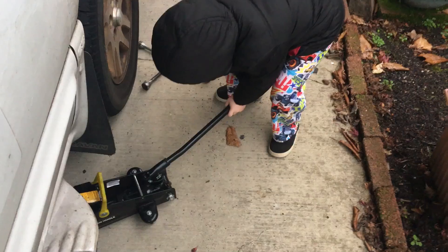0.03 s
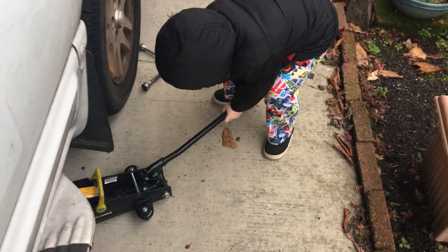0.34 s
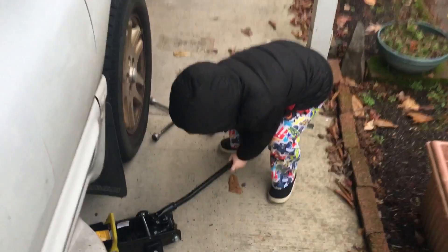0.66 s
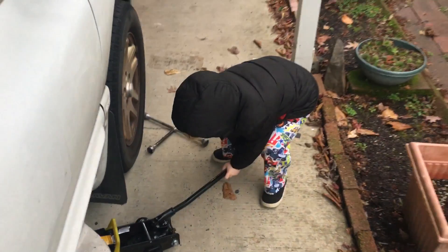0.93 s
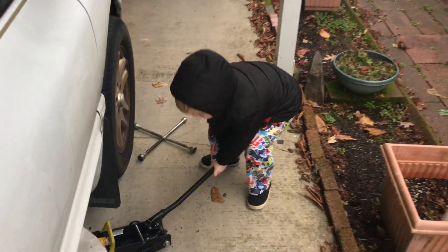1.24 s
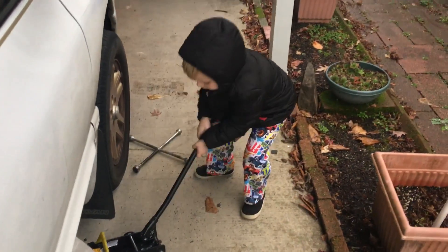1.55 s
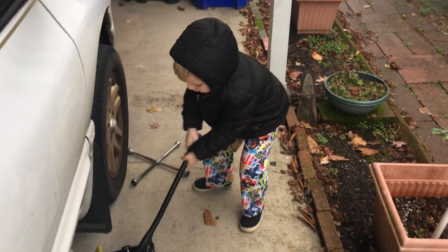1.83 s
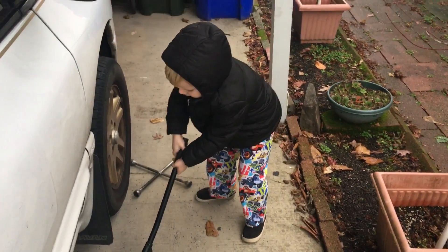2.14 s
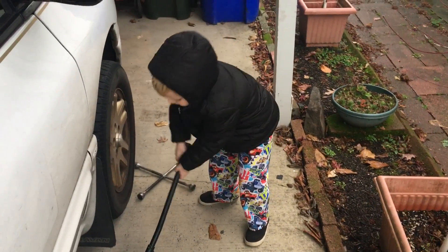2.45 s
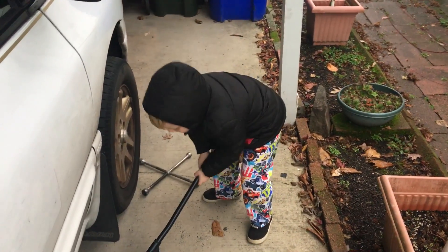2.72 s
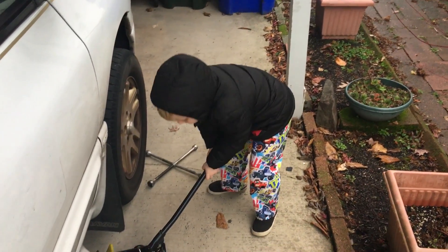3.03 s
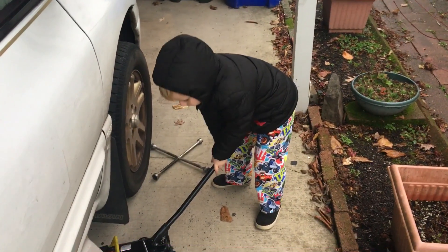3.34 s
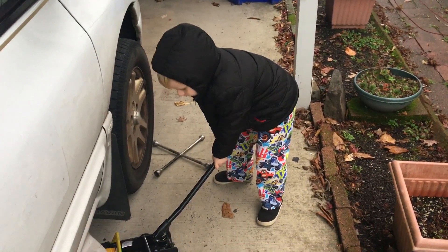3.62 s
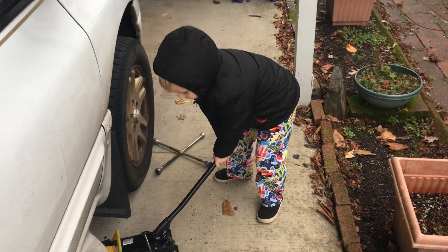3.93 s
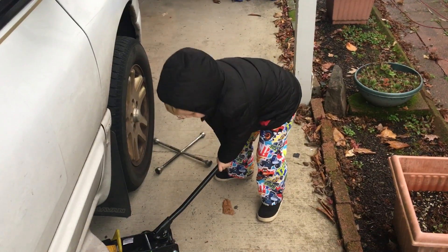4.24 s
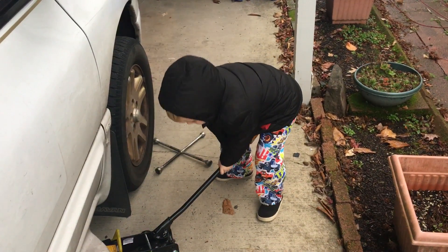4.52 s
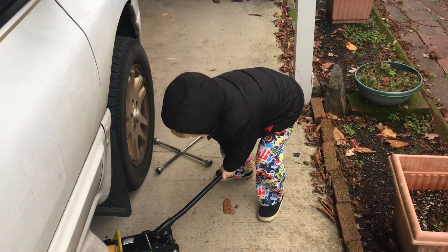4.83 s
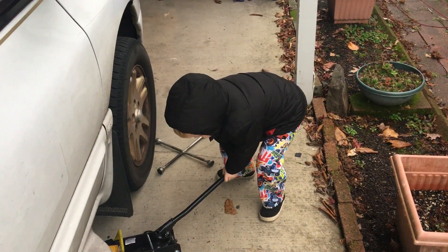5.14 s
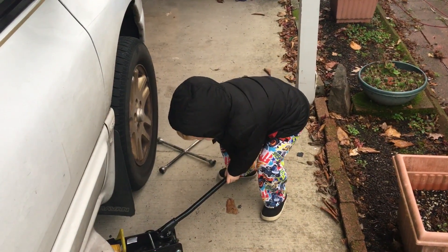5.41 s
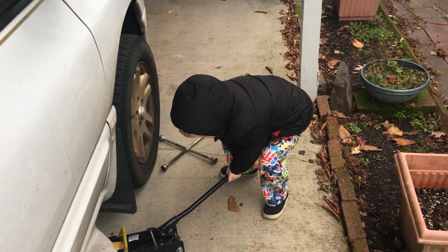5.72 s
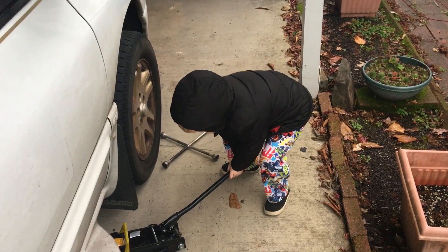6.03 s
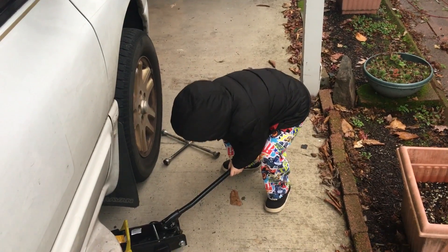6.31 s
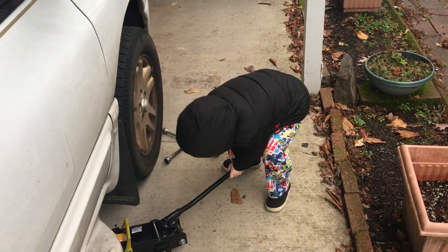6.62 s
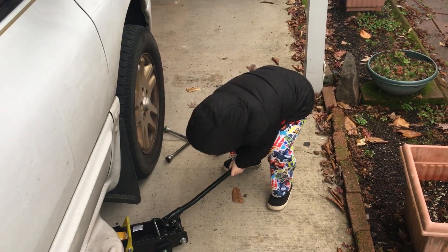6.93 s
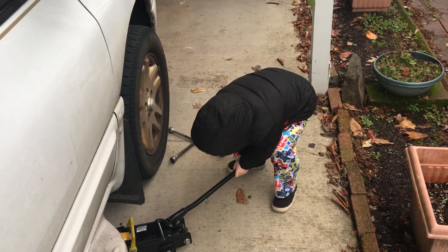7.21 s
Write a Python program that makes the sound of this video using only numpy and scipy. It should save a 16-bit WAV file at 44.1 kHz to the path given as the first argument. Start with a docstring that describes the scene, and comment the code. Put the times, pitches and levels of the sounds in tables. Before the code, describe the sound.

A floor jack handle is worked close to the microphone outdoors, clinking and clunking in two brief rattling bursts early on and once more, damped, near the end. Small taps and pings fall in between, while a nylon jacket rustles softly and shoes scuff faintly on gritty concrete. Behind it all are a steady hiss, far traffic rumble and a low engine drone that swells briefly at the start and for longer in the second half.

```python
"""Light taps and a rustle over a distant engine, then bright steel knocks: a floor jack's handle at work.
The long handle rattles in its loose socket and rings the jack's frame; a parked car and the house throw
the sound back across the concrete driveway. Shoes scuff grit and a jacket swishes, while the engine
drones and slowly gains speed in two gears under outdoor hiss and rumble."""
import sys
import numpy as np
from scipy import signal
from scipy.fft import rfft, irfft
from scipy.io import wavfile
from scipy.ndimage import uniform_filter1d

SR = 44100
rng = np.random.default_rng(int(sys.argv[2]) if len(sys.argv) > 2 else 0)


def store_wav(level_fs):
    """Save 16-bit WAV to argv[1]."""
    pcm = np.round(np.clip(np.atleast_2d(level_fs), -1, 1) * 32767)
    wavfile.write(sys.argv[1], SR, pcm.T.astype(np.int16))


N = 325017
T = np.arange(N) / SR


def jack(gain_db=-1, bounce_s=.027, bounce_shrink=.6, frame_hz=327):
    """The handle knocks in its socket; each rebound comes sooner and weaker and rocks the frame."""
    # handle knocks: start_s, thud_db, ring_db, tick_db, contact_hz (pitch the contact favours), rebounds
    knocks = [(1.454, -51, -43, -58, 2400, 0), (1.483, -46, -40.5, -51, 2340, 0),
              (1.489, -42.5, -44, -49.5, 1440, 0), (1.498, -43.5, -41, -52, 2070, 0),
              (1.569, -45, -39.5, -49, 2120, 0), (1.586, -36.5, -41.5, -46, 715, 2),
              (1.801, -48, -41.5, -48, 3070, 0), (1.845, -51, -47, -46, 7000, 1),
              (1.893, -41.5, -41.5, -71, 1020, 1), (2.576, -54, -43.5, -44.5, 10500, 0),
              (2.588, -47, -44, -44.5, 6660, 0), (2.608, -48, -35.5, -44, 2080, 0),
              (2.633, -45.5, -33.5, -49, 2110, 3), (2.716, -43, -47.5, -59, 730, 0),
              (2.740, -44, -50, -55, 320, 0), (6.7707, -51, -37.5, -49.5, 1990, 0),
              (6.799, -51, -41.5, -63, 2000, 1)]
    # the hands damp the handle: time_s, decay_scale (factor on ring and clatter times)
    grip = [(1.5, 1), (1.85, 0.69), (2.63, 0.85), (6.78, 0.35)]
    loss_db = np.array([3, 7, 10])  # thud, ring and tick, per rebound
    out = np.zeros(N)
    for start_s, *levels_db, contact_hz, rebounds in knocks:
        decay_scale = np.interp(start_s, *np.transpose(grip))
        add(out, start_s, knock(levels_db, contact_hz, decay_scale))
        for k in range(1, round(rebounds) + 1):
            start_s += bounce_s * bounce_shrink ** (k - 1)
            add(out, start_s, knock(levels_db - k * loss_db, frame_hz, decay_scale))
    return undb(gain_db) * out


def knock(levels_db, contact_hz, decay_scale, detune=.0034, clatter_db=6, crack_db=-2):
    """Steel strikes steel: a crack, a short clatter of crowded modes, then the strong modes ring on."""
    # modes of the jack and its handle: pitch_hz, relative_db, t60_s (before the grip damps them)
    steel_modes = [(225, 3, 0.15), (323.4, -0.5, 0.15), (376.4, -4.5, 0.3), (532, -2, 0.071),
                   (689, -4, 0.14), (758, -3, .15), (937, -3.5, 0.1), (1140, -6, 0.14), (1560, -16, 0.11),
                   (1670, -2.5, 0.3), (1736, -8.5, 0.19), (1860, -4.5, 0.21), (1960, 6.5, 0.033),
                   (2106, -1, 0.13), (2310, 1, 0.11), (2410, -6, 0.098), (2900, -21, .06),
                   (3234, -7, 0.052), (3310, -10, 0.082), (3770, -22, 0.06), (4320, -21.5, 0.11),
                   (5550, -17.5, 0.045), (5700, -22, .055), (6250, -16, .04), (7240, -31, 0.026),
                   (8170, -21, .03), (9270, -16, 0.041), (13100, -18, .02)]
    pitch_hz, mode_db, t60_s = np.transpose(steel_modes)
    t = np.arange(SR // 2) / SR
    favour = lambda hz: undb(8 * bell(hz, contact_hz, octaves=.14))
    # the loose handle sits differently at every knock, which shifts its modes a little
    gains = undb(mode_db + 2 * rng.standard_normal(len(pitch_hz))) * favour(pitch_hz)
    pitch_hz = pitch_hz * (1 + detune * rng.standard_normal(len(pitch_hz)))
    phases = rng.uniform(0, 2 * np.pi, len(pitch_hz))
    modes = sum(gain * fade(t, decay_scale * t60) * np.sin(2 * np.pi * hz * t + phase)
                for hz, gain, t60, phase in zip(pitch_hz, gains, t60_s, phases))
    clatter_tone = colour([(150, -16), (300, -7), (1400, 6), (1700, 7.5), (2300, 4), (2800, 1),
                           (4000, -3.5), (5000, -18), (6500, -20), (15000, -27)])
    clatter = fade(t, t60=.1 * decay_scale) * noise(len(t), lambda hz: clatter_tone(hz) * favour(hz))
    crack_tone = colour([(2000, 20), (7000, -23), (15000, -9)])
    crack = fade(t, t60=.025) * noise(len(t), lambda hz: crack_tone(hz) * favour(hz))
    hit = modes + undb(clatter_db) * clatter + undb(crack_db) * crack
    # a blunt contact that favours low modes also lacks the highest treble
    cutoff_hz = min(4000 + .87 * contact_hz, .45 * SR)
    hit = signal.sosfilt(signal.butter(1, cutoff_hz, fs=SR, output="sos"), hit)
    thud = band(hit, 232, 900)  # heavy frame
    ring = band(hit, 1040, 4300)  # handle tube
    tick = band(hit, 6030, 17300)  # hard contact
    # balance the three by their first 10 ms
    return sum(undb(db) * part / np.std(part[:SR // 100])
               for db, part in zip(levels_db, (thud, ring, tick)))


def small_contacts(ping_octaves=.048, ping_t60_s=.078):
    """Light contacts die away at once, as dry taps or thin pings of narrow noise."""
    # taps around the jack and underfoot: start_s, level_db, centre_hz, width_octaves, t60_s
    taps = [(.2057, -42, 3850, 0.58, .019), (.370, -35, 990, 0.79, 0.029), (.497, -47.5, 11000, .33, .022),
            (1.123, -37, 1290, 1.25, 0.04), (1.4895, -42.5, 12000, .25, .02), (1.689, -49, 13000, .2, .015),
            (1.845, -45, 12900, .15, .02), (2.088, -50, 5840, .21, 0.095), (2.608, -38.5, 4150, .35, .04),
            (2.897, -47.5, 6370, .25, .04), (4.574, -35.5, 380, 0.27, 0.036),
            (5.302, -47, 7500, 0.46, .012), (6.540, -43.5, 443, .35, 0.046),
            (6.654, -45.5, 2520, 0.23, 0.045), (6.770, -45, 14000, .16, .022),
            (6.895, -49.5, 2270, 0.41, .22), (7.260, -46, 3200, .45, .02)]
    # pings of the small steel parts: start_s, level_db, centre_hz
    pings = [(1.801, -42.5, 2500), (2.600, -47, 10930), (4.772, -50.5, 3280), (6.405, -54, 4240),
             (6.770, -42, 3850), (6.770, -46, 9430), (6.800, -46.5, 4050), (7.148, -50.5, 3420)]
    contacts = list(taps) + [(*ping, ping_octaves, ping_t60_s) for ping in pings]
    out = np.zeros(N)
    t = np.arange(SR // 5) / SR
    for start_s, level_db, centre_hz, octaves, t60_s in contacts:
        decay = fade(t, t60_s)
        burst = decay * noise(len(t), lambda hz: bell(hz, centre_hz, octaves))
        add(out, start_s, undb(level_db) * burst * np.linalg.norm(decay) / np.linalg.norm(burst))
    return out


def driveway_echo(x, wet_db=-10, treble_db=-5, predelay_s=.0055):
    """The car's side and the house wall return a short tail whose treble dies first."""
    t = np.arange(SR // 2) / SR
    body = noise(len(t), colour([(3000, -4.5), (6000, -2), (12000, -19)])) * fade(t, t60=.36)
    treble = noise(len(t), colour([(2000, -22), (6000, 8), (16000, -3)])) * fade(t, t60=.18)
    tail = (body + undb(treble_db) * treble) * (t > predelay_s)
    return x + undb(wet_db) * signal.fftconvolve(x, tail / np.linalg.norm(tail))[:N]


def body_motion(still_db=-66.5, attack_s=.05, release_s=.3):
    """Rubbing level in dB: each movement rises, holds and dies away over the rustle at rest."""
    # movements that rub jacket and shoes: start_s, end_s, level_db
    moves = [(.03, .25, -65), (1.094, 1.403, -56.5), (2.055, 2.702, -60), (2.816, 3.25, -59),
             (3.76, 4.35, -66), (6.85, 6.98, -57.5)]
    power = undb(still_db) ** 2
    for start_s, end_s, level_db in moves:
        attack = np.clip((T - start_s) / attack_s, 0, 1)
        release = np.exp(-np.maximum(T - end_s, 0) / release_s)
        power = power + (undb(level_db) * attack * release) ** 2
    return 10 * np.log10(power)


def jacket(motion_db, gain_db=-1, surge_db=4.5):
    """Nylon swishes in dense slips whose colour keeps shifting."""
    folds = [(1100, -4.5), (2200, -7), (3500, -8), (5600, -6.5)]  # centre_hz, relative_db
    swish = sum(undb(db + surge_db * walk(22.06))
                * grains(hz, octaves=.32, per_s=700, spread_db=2.2, t60=.027) for hz, db in folds)
    return undb(gain_db + motion_db) * swish


def shoe_grit(motion_db, gain_db=-65, surge_db=1.5):
    """Sand crackles thinly under the shoes and swells gently as the body moves."""
    sand = [(4000, -5), (7500, -4.5), (12000, -8.5)]  # centre_hz, relative_db
    crackle = sum(undb(db + surge_db * walk(10))
                  * grains(hz, octaves=.43, per_s=90, spread_db=4.7, t60=.02) for hz, db in sand)
    return undb(gain_db + .5 * (motion_db - motion_db.mean())) * crackle


def engine(start_hz, levels, load_db, climb_hz_per_s=3.15, throb_db=.5):
    """Only the lowest exhaust tones carry this far; they climb, and load lifts the overtones."""
    # exhaust tones: multiple (of the firing rate), relative_db
    harmonics = [(1, 3.5), (2, -15), (3, -34)]
    time_s, level_db = np.transpose(levels)
    firing_hz = start_hz + climb_hz_per_s * (T - time_s[0])
    phase = 2 * np.pi * np.cumsum(firing_hz) / SR
    drone = np.zeros(N)
    for multiple, db in harmonics:
        k = round(multiple)
        flutter = (k - 1) * walk(25)
        drone += undb(db + load_db * (k - 1)) * np.sin(k * phase + flutter)
    in_gear = (T > time_s[0] - .1) & (T < time_s[-1] + .1)
    gate = uniform_filter1d(in_gear.astype(float), SR // 10)
    return unit(drone) * gate * undb(np.interp(T, time_s, level_db) + throb_db * walk(12))


def outdoor_air(rumble_db=-43.5, hiss_db=-53, settle_db=2.5, settle_s=1):
    """Far traffic rumbles under a smooth hiss; the rumble starts a little louder and settles."""
    # spectrum of the traffic rumble: frequency_hz, relative_db
    rumble_tone = [(20, -9), (30, -23), (42, -3.5), (65, 3.5), (90, -2.5), (130, -3), (180, -8.5),
                   (250, -12.5), (330, -14), (450, -24), (700, -47.5)]
    # spectrum of the outdoor hiss: frequency_hz, relative_db
    hiss_tone = [(200, -15.5), (450, 4), (1000, 1.5), (1900, -0.5), (2650, -9), (3300, -5.5), (4200, -6.5),
                 (4900, -13), (6200, -10), (7600, -15.5), (9200, -13), (10300, -23), (11500, -19.5),
                 (16000, -28)]
    lift_db = settle_db * np.exp(-T / settle_s)
    rumble = noise(N, colour(rumble_tone)) * undb(rumble_db + lift_db + .5 * walk(8))
    hiss = noise(N, colour(hiss_tone)) * undb(hiss_db + 1.27 * walk(5.18))
    return rumble + hiss


def grains(centre_hz, octaves, per_s, spread_db, t60):
    """A stream of tiny slips of unequal size, each a fresh burst of noise; rms 1."""
    onsets = rng.random(N) < per_s / SR
    slips = onsets * undb(spread_db * np.minimum(rng.exponential(size=N), 3))
    power = signal.lfilter([1], [1, -fade(1 / SR, t60) ** 2], slips ** 2)
    return tint(np.sqrt(power) * rng.standard_normal(N), lambda hz: bell(hz, centre_hz, octaves))


def walk(rate_hz):
    """Smooth random drift: held steps, slewed twice; rms 1."""
    hold = int(SR / rate_hz)
    steps = np.repeat(rng.standard_normal(N // hold + 1), hold)
    return unit(uniform_filter1d(uniform_filter1d(steps, hold), hold)[:N])


def noise(size, gain):
    """Noise of rms 1 whose spectrum follows gain(hz)."""
    return tint(rng.standard_normal(size), gain)


def tint(x, gain):
    """Filter x by gain(hz) and scale it to rms 1."""
    return unit(irfft(rfft(x) * gain(np.fft.rfftfreq(len(x), 1 / SR)), len(x)))


def colour(points):
    """An EQ curve through points of frequency_hz, gain_db."""
    frequency_hz, gain_db = np.transpose(points)
    return lambda hz: undb(np.interp(np.log(hz + 1), np.log(frequency_hz), gain_db))


def bell(hz, centre_hz, octaves):
    """A hump of height 1 on the octave scale."""
    return np.exp(-.5 * (np.log2((hz + 1) / centre_hz) / octaves) ** 2)


def band(x, low_hz, high_hz):
    """Causal band-pass."""
    return signal.sosfilt(signal.butter(3, [low_hz, high_hz], "band", fs=SR, output="sos"), x)


def fade(t, t60):
    """Free decay, 60 dB down after t60 seconds."""
    return np.exp(-np.log(1000) * t / t60)


def add(out, start_s, x):
    """Mix x into out from start_s on."""
    i = int(start_s * SR)
    out[i:i + len(x)] += x[:max(N - i, 0)]


def undb(db):
    """Decibels to gain."""
    return 10 ** (np.asarray(db) / 20)


def unit(x):
    """Scale to rms 1."""
    return x / np.sqrt(np.mean(x ** 2) + 1e-20)


def scene():
    """Close steel and footwork in front of the distant street."""
    # engine swell in low gear: time_s, level_db
    low_gear = [(.08, -41.5), (.64, -37), (.88, -53.5), (1.9, -59)]
    # engine swell in high gear: time_s, level_db
    high_gear = [(2.699, -60), (3.45, -35.5), (5.38, -30.5), (5.55, -36.5), (6.4, -37.5), (6.62, -51),
                 (7.35, -46.5)]
    street = engine(start_hz=71.9, levels=low_gear, load_db=6.5)
    street += engine(start_hz=54.9, levels=high_gear, load_db=-1.5)
    street += outdoor_air()
    impacts = driveway_echo(jack() + small_contacts())
    motion_db = body_motion()
    return (impacts + jacket(motion_db) + shoe_grit(motion_db) + street)[None]


def record(dry, start_s=.083, top_hz=15900):
    """The sound cuts in after a moment of silence, its highest treble sheared off."""
    lowpass = signal.ellip(10, .1, 80, top_hz, fs=SR, output="sos")
    return signal.sosfilt(lowpass, dry * (T > start_s))


dry = scene()
out = record(dry)
store_wav(out)
```